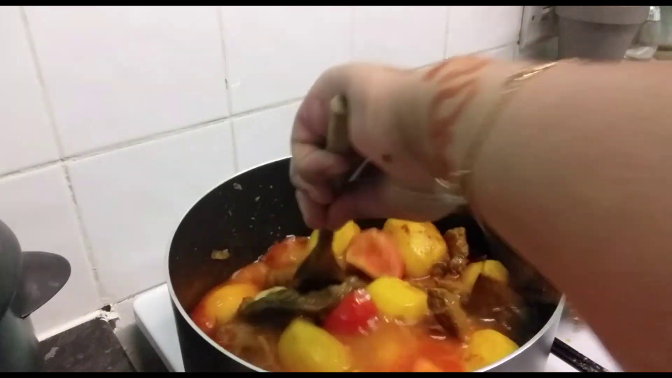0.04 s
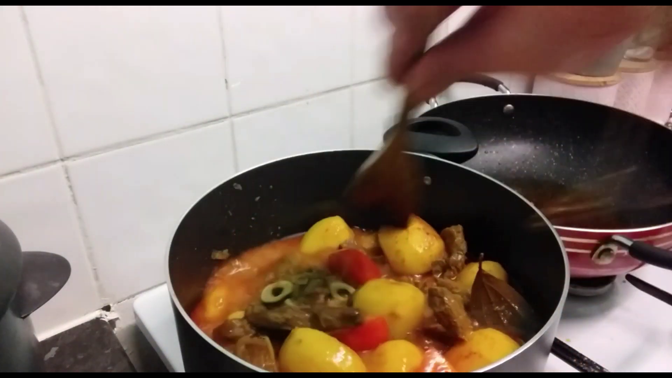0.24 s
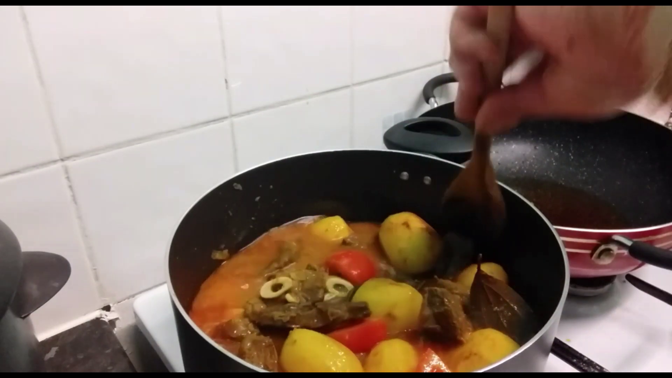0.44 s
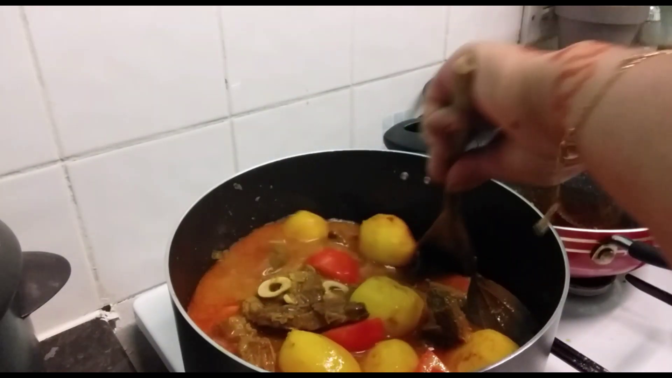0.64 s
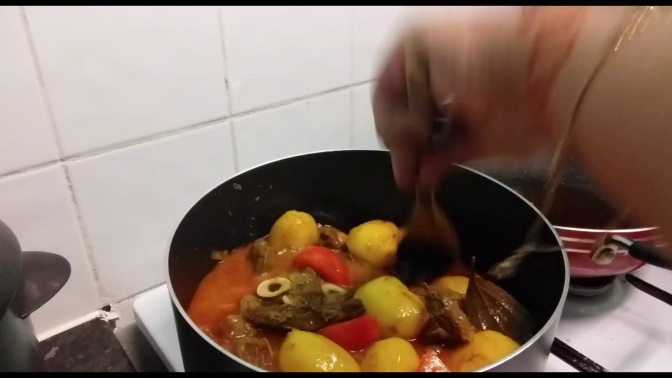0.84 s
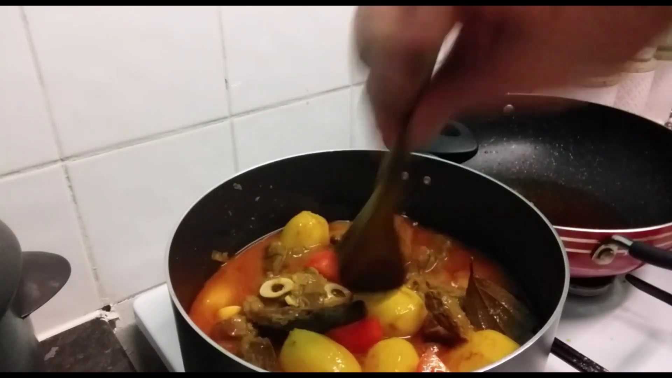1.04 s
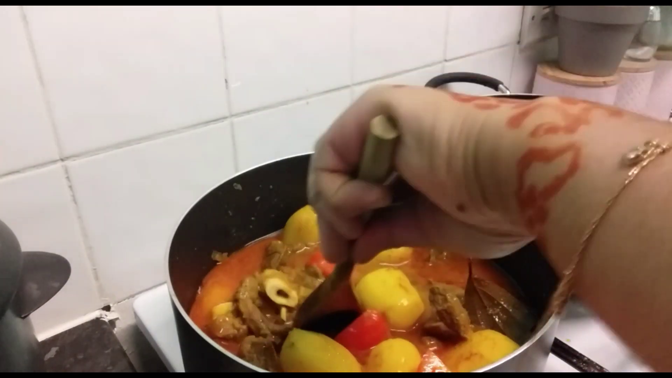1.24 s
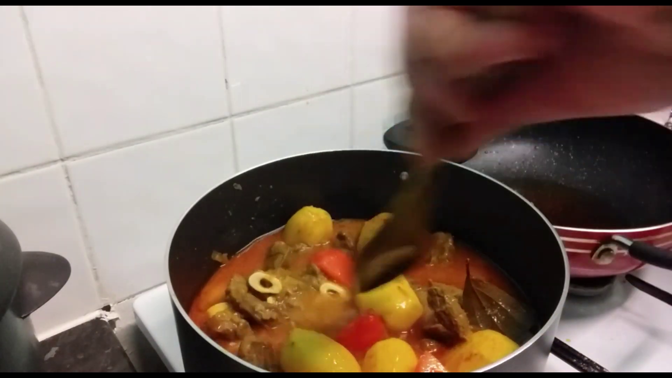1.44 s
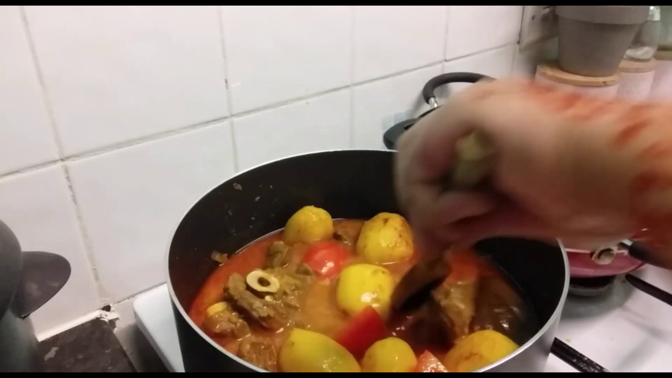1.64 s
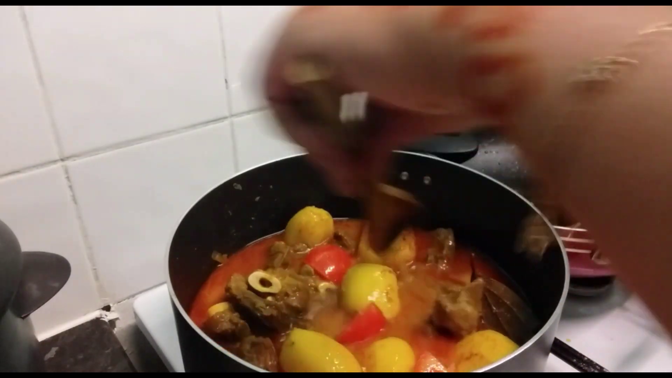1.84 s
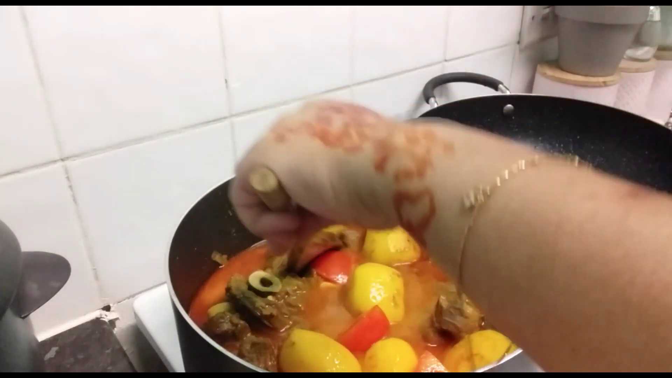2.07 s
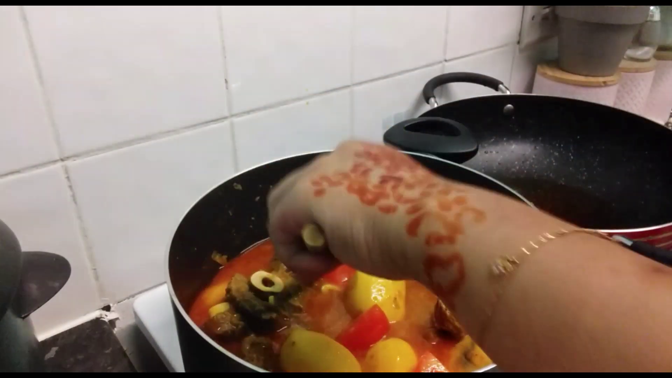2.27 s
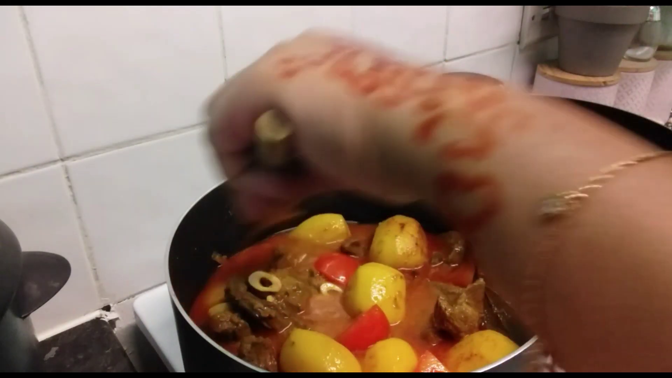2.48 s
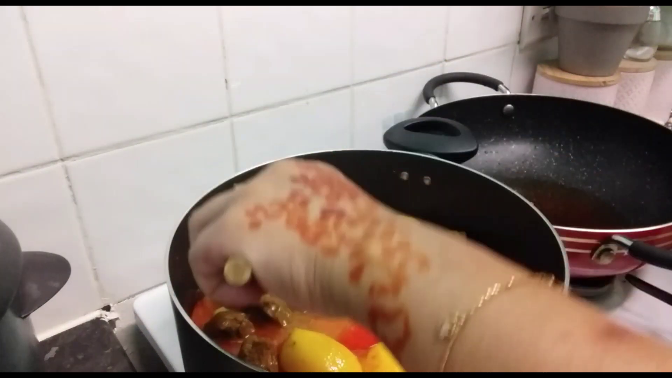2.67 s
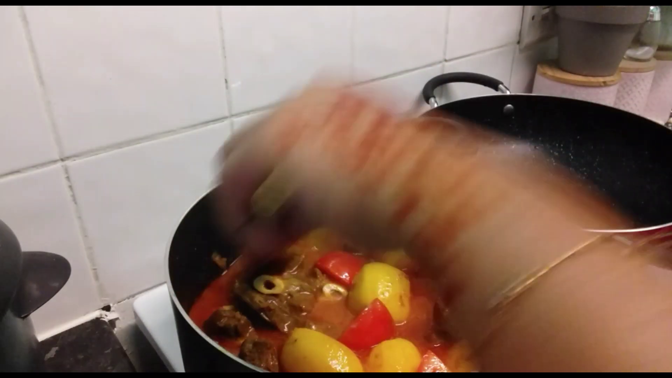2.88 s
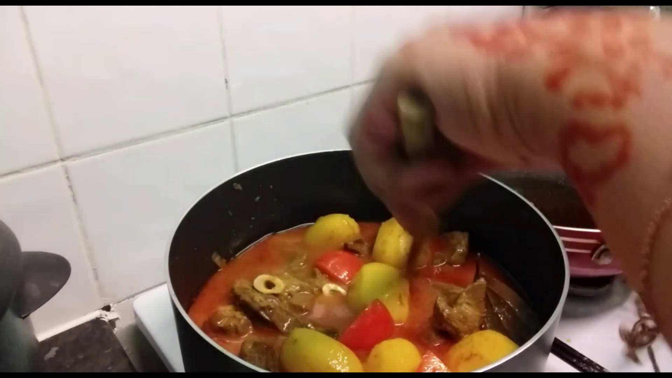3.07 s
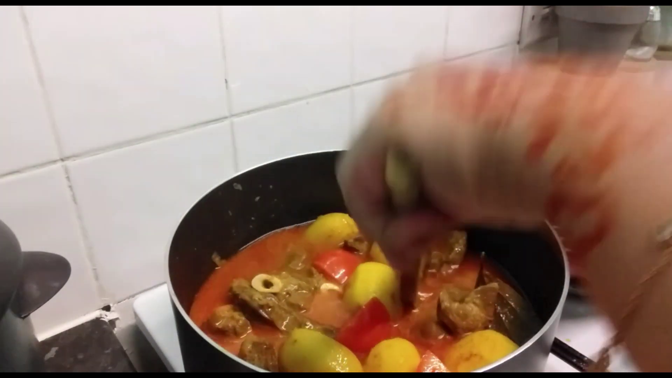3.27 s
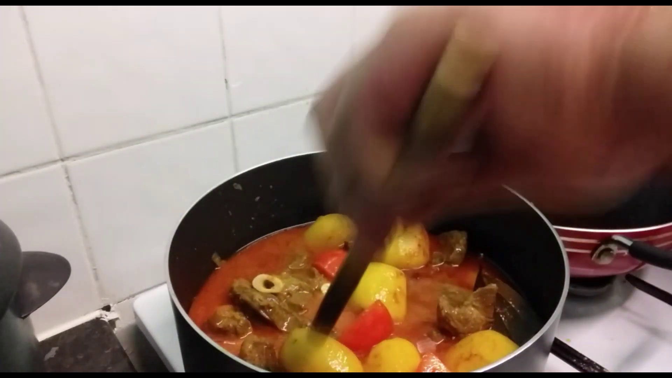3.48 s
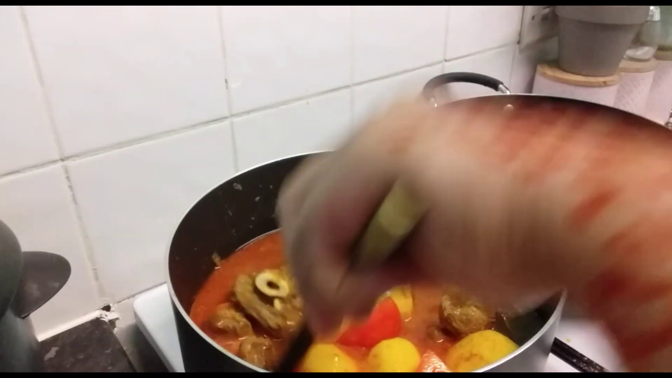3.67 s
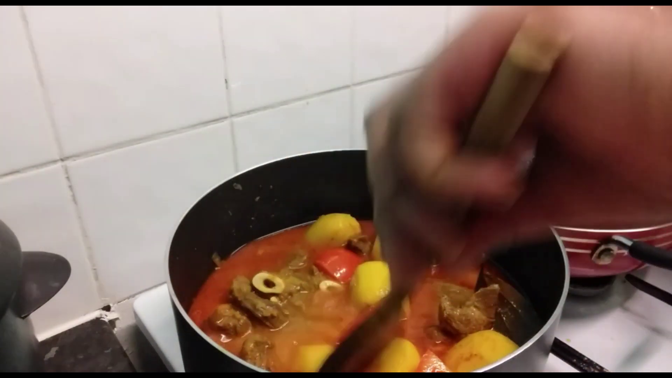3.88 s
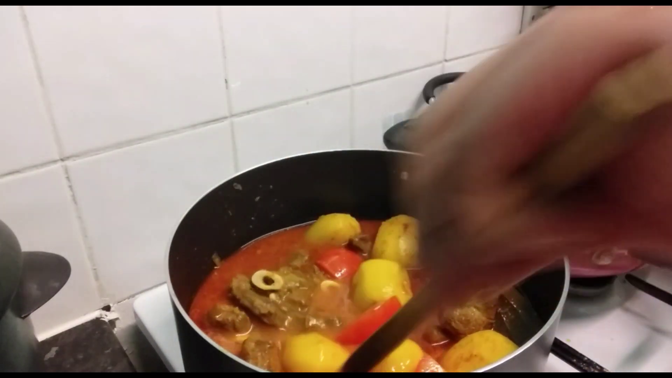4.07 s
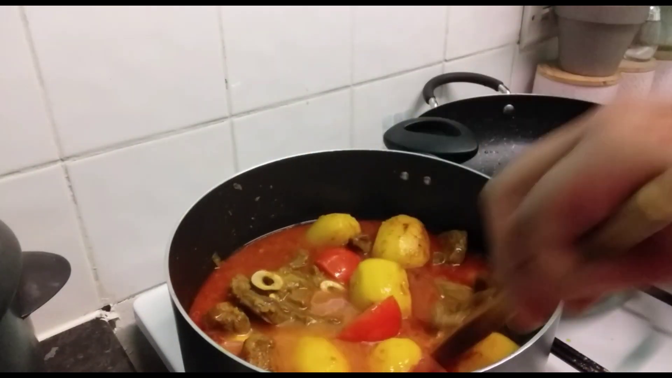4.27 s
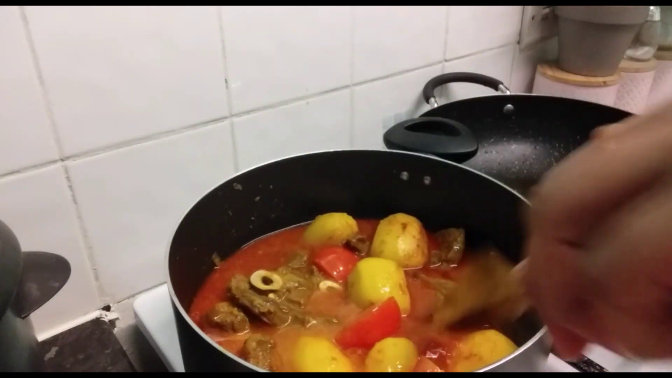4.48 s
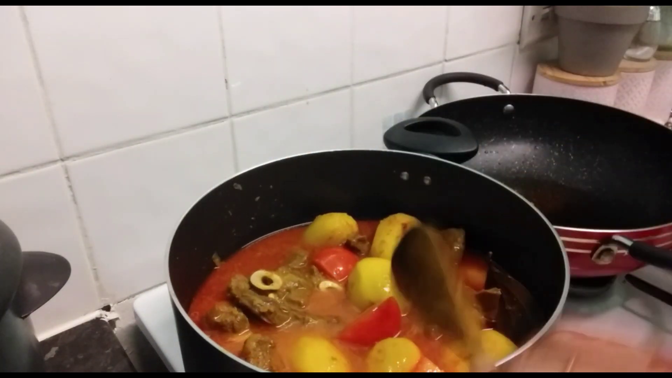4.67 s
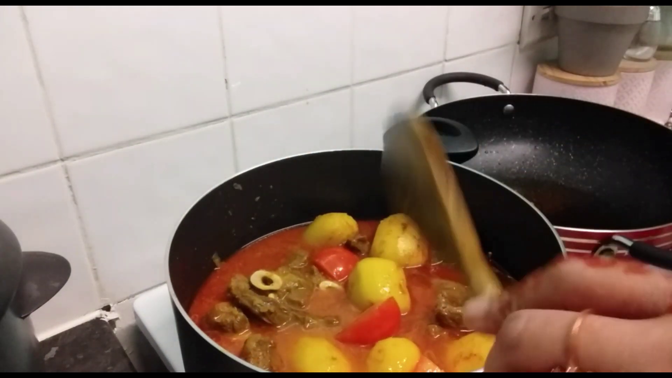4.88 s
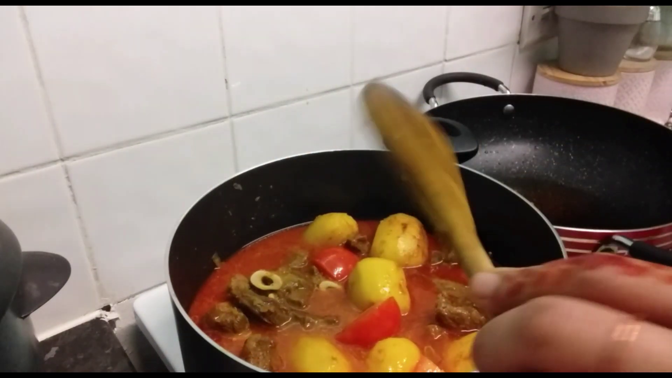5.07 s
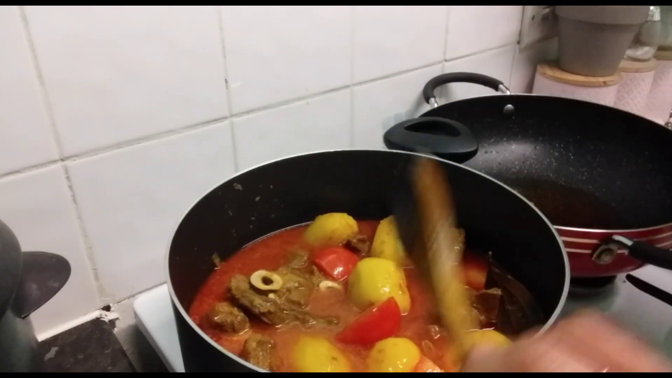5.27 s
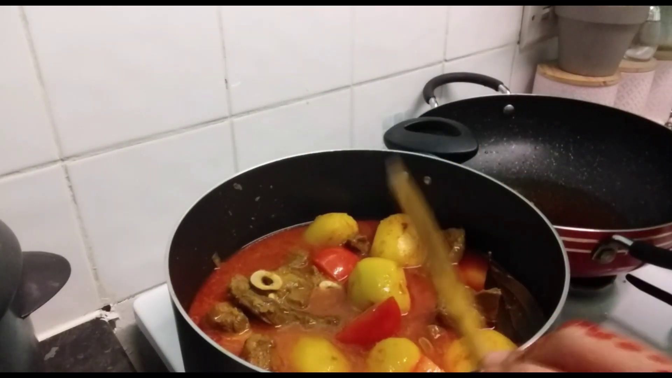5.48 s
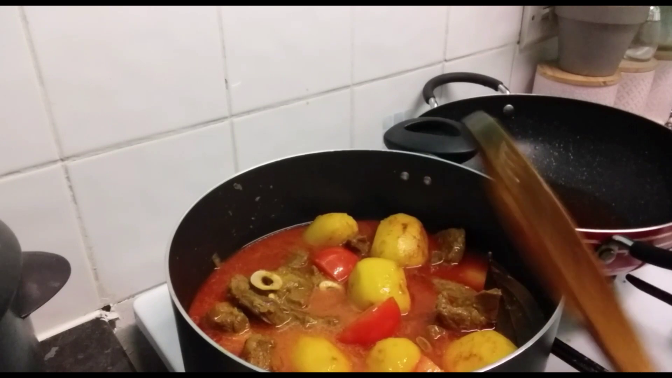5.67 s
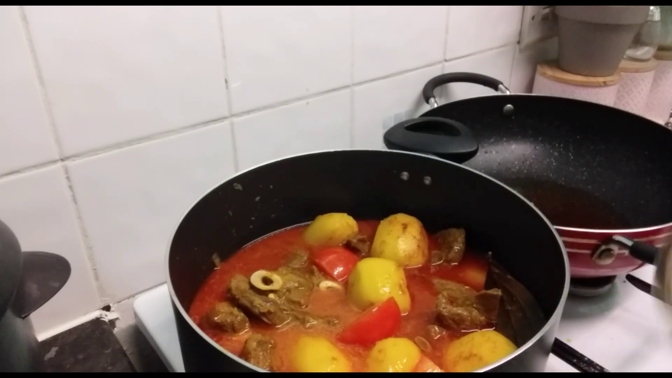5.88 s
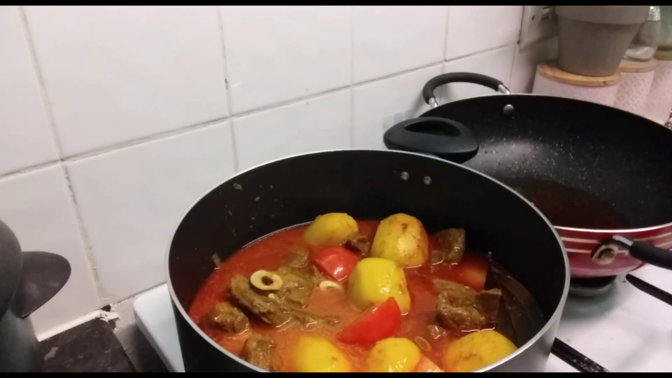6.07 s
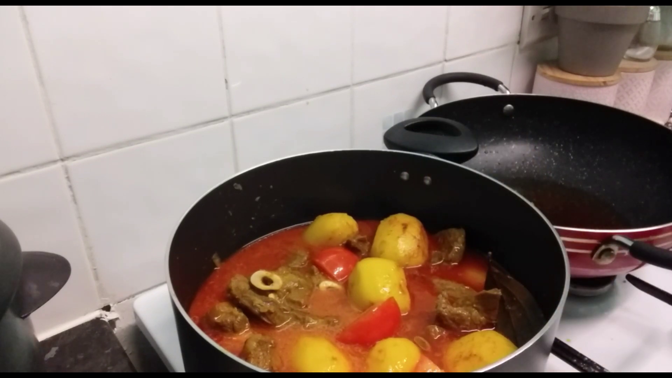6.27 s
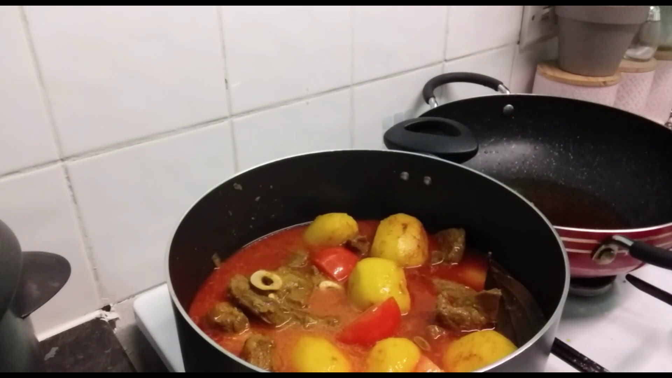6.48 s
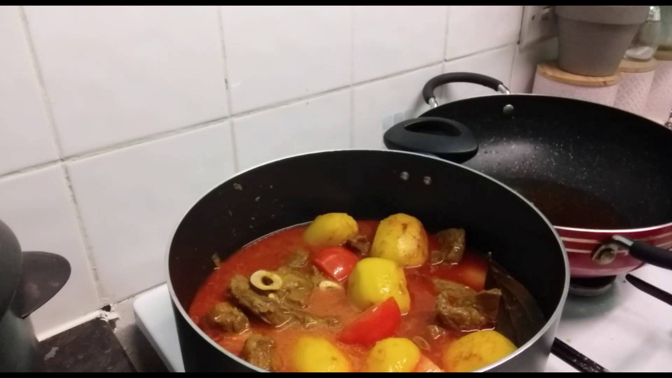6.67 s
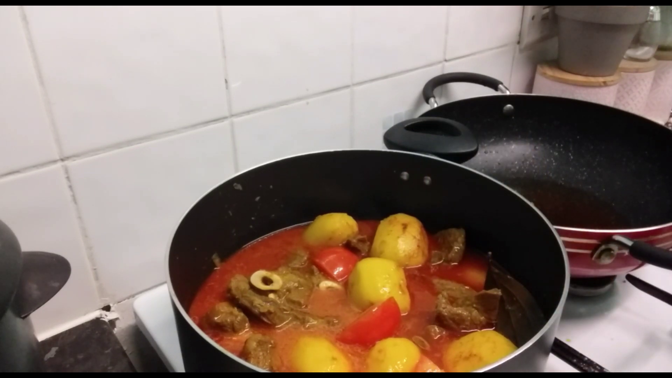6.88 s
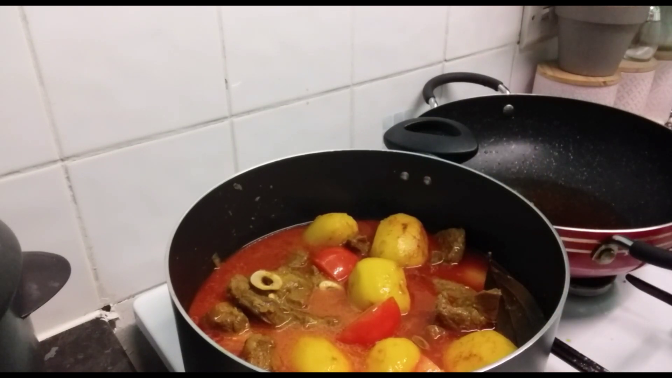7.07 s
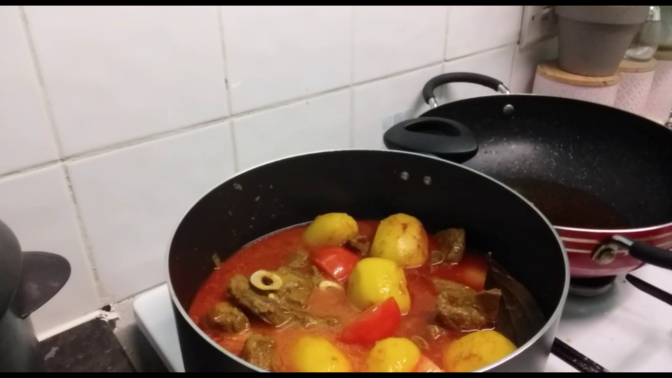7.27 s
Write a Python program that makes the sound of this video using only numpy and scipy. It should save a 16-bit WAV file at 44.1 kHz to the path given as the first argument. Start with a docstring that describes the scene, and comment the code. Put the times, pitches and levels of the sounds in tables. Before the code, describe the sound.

Stirring a pot of stew with small clicks and scrapes, then three ringing rim knocks and the clatter of a spatula set down.

```python
"""Spatula and pot in a tiled kitchen

A near-mono microphone stands back in the room, where a motor hums in close, beating tones. A spatula
ticks, rustles and scrapes in a pot, and soft bumps come through the stove. The spatula is knocked
on the ringing rim, then laid down with a clatter. The hard walls answer the clicks, scrapes and blows."""
import sys
import numpy as np
from scipy import signal
from scipy.fft import rfft, irfft, next_fast_len
from scipy.io import wavfile
from scipy.ndimage import uniform_filter1d, map_coordinates

SR = 44100
rng = np.random.default_rng(int(sys.argv[2]) if len(sys.argv) > 2 else 0)


def int16_out(signal):
    """Quantize to a 16-bit WAV file."""
    q = np.round(np.clip(np.atleast_2d(signal).T, -1, 1) * 32767)
    wavfile.write(sys.argv[1], SR, q.astype(np.int16))


N = 323233

# Reverberation of the tiled room: f/Hz, t60/s
WALL_DECAY = [(100, 0.71), (400, 0.36), (1500, 0.39), (5000, 0.35), (10000, 0.35), (16000, 0.82)]
# Early reflections off pot wall, stove top and tiles: nominal delay/s, level/dB
NEAR_ECHOES = [(.0021, -2), (.0043, -12.5), (.0068, 1), (0.0126, -17)]
# Spectrum of the room tone: f/Hz, level/dB
ROOM_SPECTRUM = [(25, -38), (60, -5.5), (99, -3), (135, -10), (204, -22), (260, -19), (350, -14),
                 (430, -2.5), (553, -18), (744, -14.5), (1000, -22), (1210, -18.5), (1500, -30),
                 (7540, -31), (9100, -40), (15600, -31)]
# Spectrum of a faint steady treble hiss, opposite in left and right: f/Hz, level/dB
SIDE_SPECTRUM = [(500, -39.5), (2000, -7), (6000, 3), (8500, 5), (16000, -4)]
# Motor tones: shaft order, rms level/dB
MOTOR_ORDERS = [(8, -76), (12, -82), (14, -72), (16, -63), (17, -60.5), (18, -72), (29, -80)]
# Drift of the strongest motor tone, order 17: t/s, f/Hz
MOTOR_PITCH = [(0, 430), (2.0, 430), (4.5, 428.5), (7.33, 427)]
# Soft bumps through the stove: t/s, level/dB, f/Hz
BUMPS = [(0.479, -44.5, 104.7), (0.618, -47, 114), (1.099, -49, 153), (1.547, -45.5, 105),
         (1.92, -40.5, 103.4), (2.532, -36, 160.6), (2.697, -53, 114), (3.123, -50, 112), (3.429, -45, 106),
         (3.484, -40, 97.6), (3.828, -42, 93), (4.207, -43, 213), (5.657, -44, 93.3), (6.801, -36, 269),
         (6.919, -39.5, 77)]
# Levels of rustle and of low rumble, which swells after the knocks: t/s, rustle/dB, rumble/dB
RUSTLE_RUMBLE_LEVELS = [(0.0, -61.5, -64), (0.2, -68, -64), (0.4, -98, -67), (0.57, -65.5, -53.5),
                        (0.68, -75, -63.5), (1.6, -67, -64.5), (1.95, -83, -59), (2.1, -64.5, -58.5),
                        (2.65, -71, -57.5), (3.2, -85, -69), (4.1, -79, -65), (4.27, -65, -56),
                        (4.319, -60.5, -40), (4.6, -86, -112), (4.8, -72, -44), (5.2, -83, -67),
                        (5.45, -64.5, -33), (5.72, -64, -57.5), (6.2, -90, -67.5), (6.53, -54.5, -49.5),
                        (6.88, -59.5, -53), (7.03, -71, -72), (7.33, -56.5, -48)]
# Spectra of the treble rustle, midrange rasp and low rumble: f/Hz, level/dB
RUSTLE_SPECTRUM = [(600, -42), (1500, 0), (2500, -24.5), (3500, 3), (5500, 1), (7500, 2), (9000, -18.5),
                   (12000, -12.5), (16000, -15.5)]
RASP_SPECTRUM = [(400, -24.0), (800, 3.0), (1600, -16.5), (2600, -12), (5000, -38.5)]
RUMBLE_SPECTRUM = [(30, -20.5), (60, -10), (105, 11.5), (135, -17), (180, -8), (260, -12.5), (450, -4),
                   (900, -18.5), (1600, -61.5)]
# Short strokes of a rubbed edge: t/s, length/s, f/Hz, sharpness Q, level/dB
SCRAPES = [(0.349, 0.045, 470, 2.6, -45.5), (0.385, 0.15, 5850, 0.39, -49), (0.431, .05, 5500, 0.45, -46),
           (0.578, 0.074, 1270, 0.52, -50.5), (0.992, 0.34, 2000, 5.6, -73.5),
           (1.955, 0.054, 870, 0.66, -59), (2.136, 0.062, 7300, 2.5, -54.5),
           (2.567, 0.06, 1580, 0.21, -47.5), (3.533, 0.075, 4700, 0.27, -54), (3.887, 0.064, 5540, .8, -67),
           (4.074, 0.25, 4440, 2.7, -70.5), (4.932, .13, 5840, 6.7, -70), (5.03, 0.13, 1134, 12, -65),
           (5.615, 0.19, 4570, 2.4, -62), (5.881, 0.11, 5040, 2.5, -66.5), (6.08, 0.18, 2520, 7.2, -78.5),
           (6.702, 0.046, 3260, 14, -60), (6.816, 0.097, 3270, 9.8, -57), (6.826, 0.1, 2350, 23, -63),
           (6.819, 0.067, 5300, 1.9, -49.5), (6.902, 0.26, 5640, 14, -63.5), (7.091, 0.13, 2356, 18, -74.5)]
# Small contacts in the pot: t/s, level/dB, click f/Hz, sharpness Q, weight/dB, thin top/dB
CONTACTS = [(0.005, -33.5, 2896, 29, -12, -22), (0.045, -40.5, 3130, 3.3, -5, 0.5),
            (0.128, -40, 4160, 8.7, -3, -15), (0.152, -30.5, 8000, 6.9, -19, -17),
            (0.167, -67, 7400, 4.5, -8, 18), (0.361, -46.5, 750, 8.8, 5, -23),
            (0.418, -37.5, 760, 0.75, -16, -37), (0.452, -22.5, 3540, 2.7, -5, -8),
            (0.459, -28.5, 4960, 9.8, 4.5, -11.5), (0.546, -27.5, 5340, 2.1, -32, -4.5),
            (0.6, -44, 1150, 2.9, -9, -22), (0.725, -41.5, 3750, 2.5, -1, -19),
            (0.857, -40.5, 7700, 8.9, -14, -7.5), (1.023, -41.5, 7150, 3, -4, -24.5),
            (1.054, -45.5, 6960, 2.2, -13, 1), (1.118, -38.5, 7700, 5.7, -5, -0.5),
            (1.373, -49.5, 3700, 1.7, -5, -17), (1.452, -57, 6040, 17, -3, -18),
            (1.549, -40, 4540, 3.4, -1, -12), (1.59, -37, 2940, 11.6, -10, -12.5),
            (1.621, -49, 2850, 1.7, 5, 8), (1.935, -37, 6950, 2.2, -19, 1.5),
            (2.015, -43, 1100, 13, 18.5, -32), (2.144, -29, 5300, 1.1, 3, -14),
            (2.533, -46, 5510, 7.7, -9, 5.5), (2.561, -30, 2370, 6.7, 4.5, -16),
            (2.635, -36, 3800, 2.6, 6, -5.5), (3.059, -64.5, 7000, 5, 0, 4.5),
            (3.527, -43.5, 7150, 6.6, 13.5, -0.5), (3.855, -59, 5600, 2.8, 4, 9),
            (4.269, -46, 4230, 7.3, -5, -25), (4.294, -36.5, 5060, 0.65, 7.5, -7),
            (4.9, -56.5, 6000, 3.6, -5, -15), (5.879, -52, 4990, 3.1, -15, -26.5),
            (6.714, -49, 3270, 15, 2, 3), (6.811, -51.5, 565, 16, 1, -20),
            (6.83, -41.5, 5550, 7.3, 11, -0.5), (7.1, -47, 3440, 6, -1.5, -12),
            (7.287, -45.5, 690, 5.6, -2, -30), (7.312, -42, 630, 5.2, -6, -7)]
# The spatula landing and settling: t/s, level/dB, brightness/dB, thud/dB
CLATTER_HITS = [(6.369, -9.5, 0.5, -3), (6.376, -11, 4.5, -7.5), (6.387, -21, 3.5, -24),
                (6.398, -15, 5.5, -19)]
# Modes rung as it lands: f/Hz, level/dB, t60/s
CLATTER_MODES = [(446, 1.5, 0.27), (566, 12, 0.044), (742, 0.5, 0.36), (788, 3, 0.41), (875, -6, 0.4),
                 (931, 1.5, 0.42), (990, -10.5, 0.22), (1162, -5, 0.45), (1405, 2.5, 0.39),
                 (1568, -9.5, 0.29), (3290, -16, 0.6), (3570, -8.5, 0.34), (3830, -13, 0.3),
                 (5120, -9, 0.4)]
# Spectrum of the landing's impact: f/Hz, level/dB
CLATTER_SPECTRUM = [(29, -67), (50, -17.5), (113, -11.5), (404, -7), (434, -5), (489, -10), (668, -8.5),
                    (718, -11.5), (1050, -7.5), (1440, -14), (2900, -20.5), (3500, -23), (5140, -18),
                    (15500, -46.5)]
# Knocks on the rim, the last with a bounce: t/s, level/dB, brightness/dB, thud/dB
RIM_HITS = [(4.647, -16.5, -6, -3.5), (5.195, -18.5, -2.5, -5), (5.391, -10, -3.5, -8.5),
            (5.424, -19.5, 0, -12)]
# Modes of the pot struck on its rim: f/Hz, level/dB, t60/s
RIM_MODES = [(110.7, 7, 0.65), (166, 2.5, 0.68), (296, -2.5, 0.55), (620, -11, 0.28), (737, -1, 0.37),
             (780, -0.5, 0.33), (1189, -3.5, 0.34), (1056, -8, 0.44), (1650, 7, 0.16), (1745, -0.5, 0.31),
             (2910, -9.5, 0.24), (3350, -18, 0.19), (4107, -2.5, .25)]
# Spectrum of the impact on the rim: f/Hz, level/dB
RIM_SPECTRUM = [(29, -74), (50, -8.5), (103, -1.5), (250, -8.5), (771, -8), (1400, -10), (1700, -5.5),
                (2000, -13.5), (3200, -12), (3750, -16), (4150, -10.5), (7730, -14.5), (8920, -27.5),
                (15500, -32)]


def amp(db):
    """Decibels to amplitude."""
    return 10 ** (np.asarray(db) / 20)


def unit_rms(x):
    """x scaled to rms 1."""
    return x / np.sqrt(np.mean(x ** 2) + 1e-20)


def along(points, hz):
    """Interpolate (f/Hz, value) points on a log frequency axis."""
    f, v = np.transpose(points)
    return np.interp(np.log(hz + 1), np.log(f + 1), v)


def wobble(rate):
    """A smooth random curve, rate knots a second."""
    return map_coordinates(rng.standard_normal(int(N * rate / SR) + 4), [np.arange(N) * rate / SR])


def pulse(t, rise_s=0.00002):
    """One smooth push, reaching 1 after rise_s."""
    u = t / rise_s
    return u * np.exp(1 - u)


def filtered(x, response):
    """x through a complex frequency response."""
    n = x.shape[-1]
    padded = next_fast_len(n + 8192)
    return irfft(rfft(x, padded) * response(np.fft.rfftfreq(padded, 1 / SR)), padded)[..., :n]


def minimum_phase(points):
    """The causal response with the gain of (f/Hz, level/dB) points."""
    def response(hz):
        cepstrum = irfft(np.log(amp(np.maximum(along(points, hz), -70))))
        half = len(cepstrum) // 2
        cepstrum[1:half] *= 2
        cepstrum[half + 1:] = 0
        return np.exp(rfft(cepstrum))
    return response


def band(f, hz, q):
    """Response of one resonance at hz."""
    return 1j * f * hz / q / (hz * hz - f * f + 1j * f * hz / q)


def lowpass(f, hz, slope):
    """Gain that falls away above hz."""
    return 1 / (1 + (f / hz) ** slope)


def noise(spectrum, patchy_db):
    """Coloured noise of rms 1, spread unevenly over time and pitch."""
    cells = signal.stft(rng.standard_normal(N + SR), nperseg=512)[2]
    patches = uniform_filter1d(rng.standard_normal(cells.shape), size=6, axis=0)
    patches = uniform_filter1d(patches, size=10, axis=1)
    patchy = signal.istft(cells * amp(patchy_db * unit_rms(patches)), nperseg=512)[1][:N]
    return unit_rms(filtered(patchy, lambda hz: amp(along(spectrum, hz))))


def walls(source, room_db, build_s):
    """The tiles' answer alone: echoes thicken over build_s, and each frequency dies at its own speed."""
    n = len(source)
    hz, t, cells = signal.stft(rng.standard_normal(n), SR, nperseg=256)
    decay = amp(-60 * t / along(WALL_DECAY, hz)[:, None])
    tail = signal.istft(cells * decay, SR, nperseg=256)[1][:n]
    tail *= 1 - np.exp(-np.arange(n) / SR / build_s)
    return amp(room_db) * signal.fftconvolve(source, tail / np.linalg.norm(tail))[:n]


def room_tone():
    """The kitchen's low hush, behind everything."""
    return amp(-63) * noise(ROOM_SPECTRUM, patchy_db=1.5)


def motor():
    """In the background, orders of one slowly drifting shaft beat against each other."""
    times, hz = np.transpose(MOTOR_PITCH)
    shaft_hz = np.interp(np.arange(N) / SR, times, hz) / 17
    angle = 2 * np.pi * np.cumsum(shaft_hz) / SR
    hum = np.zeros(N)
    for order, db in MOTOR_ORDERS:
        level = np.sqrt(2) * amp(db + 1.3 * wobble(4))
        hum += level * np.sin(order * angle + 0.2 * wobble(4) + rng.uniform(0, 2 * np.pi))
    return hum


def stove_bumps(t60_cycles=38):
    """Each bump through the stove swells for a moment and rings low, with a rough overtone."""
    out, t = np.zeros(N + SR), np.arange(SR // 2) / SR
    for start, db, hz in BUMPS:
        grit = unit_rms(filtered(rng.standard_normal(len(t)), lambda f: band(f, 1.53 * hz, q=1.5)))
        ring = np.sin(2 * np.pi * hz * t) + 0.43 * grit
        envelope = amp(db - 60 * t * hz / t60_cycles) * (1 - np.exp(-t / 0.035))
        out[round(start * SR):][:len(t)] += envelope * ring
    return out[:N]


def rustle_and_rumble():
    """A grainy treble rustle over a midrange rasp, and a low rumble that swells after the knocks."""
    times, *levels = np.transpose(RUSTLE_RUMBLE_LEVELS)
    rustle_db, rumble_db = (np.interp(np.arange(N) / SR, times, db) for db in levels)
    grain_db, lumps_db = 1.5 * wobble(70), 2.5 * wobble(18)
    rustle = amp(rustle_db + grain_db) * noise(RUSTLE_SPECTRUM, patchy_db=2)
    rasp = amp(rustle_db - 7) * noise(RASP_SPECTRUM, patchy_db=4)
    rumble = amp(rumble_db + lumps_db) * noise(RUMBLE_SPECTRUM, patchy_db=4)
    return rustle + rasp + rumble


def edge_scrapes(rise_share=0.19):
    """A rubbed edge hisses around one mode, swells and fades along the stroke, then hangs in the room."""
    out = np.zeros(N + SR)
    for start, length, hz, q, db in SCRAPES:
        progress = np.arange(SR) / SR / length
        top_hz = max(8200, 1.44 * hz)
        mode = lambda f: band(f, hz, max(q, 0.5)) ** 2 * lowpass(f, top_hz, slope=16)
        hiss = unit_rms(filtered(rng.standard_normal(SR), mode))
        stroke = hiss * (1 - np.exp(-progress / rise_share)) * np.exp(-progress ** 3)
        out[round(start * SR):][:SR] += amp(db) * (stroke + walls(stroke, room_db=-5, build_s=0.0019))
    return out[:N]


def contact_body(f, q, weight_db, top_db):
    """Response around a click: a snap, a knock and a thud that grow with weight, and a thin top."""
    snap_db = 5 - 2 * q  # ringing clicks snap less
    snap = 1.9 * amp(snap_db) * band(f, 3130, q=1) * band(f, 7240, q=5.6) * lowpass(f, 8200, slope=24)
    knock = amp(weight_db - 1.5) * band(f, 900, q=1.9) ** 2
    thud = amp(weight_db + 2.5) * band(f, 183, q=1.68) ** 2
    top = amp(top_db) * band(f, 8500, q=0.35) / (1 + (9500 / (f + 1)) ** 12)
    return snap + knock + thud + top


def spatula_ticks():
    """Each touch on the pot pushes a pitched click and its body; surfaces around it repeat it."""
    out, t = np.zeros(N + SR), np.arange(SR * 3 // 4) / SR
    for start, db, hz, q, weight_db, top_db in CONTACTS:
        push = pulse(t) + 0.15 * amp(-60 * t / 0.002) * rng.standard_normal(len(t))
        mode = lambda f: band(f, hz, max(q, 1)) * band(f, hz, q=0.067) * lowpass(f, 8300, slope=16)
        click = filtered(push, mode)
        body = filtered(push, lambda f: contact_body(f, q, weight_db, top_db))
        contact = click / np.abs(click).max() + 3.93 * body
        echoes = np.zeros(len(t))
        for delay, echo_db in NEAR_ECHOES:
            gain = amp(echo_db + rng.normal(0, 1.1))
            echoes += gain * np.roll(contact, round(delay * rng.uniform(0.44, 1.1) * SR))
        room_db = 5.5 - 0.28 * (db + 34.5)  # louder ticks are drier
        room = walls(contact, room_db, build_s=0.0063)
        out[round(start * SR):][:len(t)] += amp(db) * (contact + echoes + room)
    return out[:N]


def ringing(modes, t):
    """Decaying modes of a struck object; reflections make them waver, the high ones faster."""
    ring = np.zeros(len(t))
    for hz, db, t60 in modes:
        knot_rate, depth = 40 + hz / 25, 0.68 * min(hz / 700, 1)
        real, imag = (map_coordinates(k, [t * knot_rate], order=1) for k in rng.standard_normal((2, 200)))
        waver = 1 + depth * (real + 1j * imag)
        ring += amp(db - 60 * t / t60) * np.imag(np.exp(2j * np.pi * hz * t) * waver)
    return ring


def blows(hits, modes, spectrum, crack_db, ring_db, room_db, build_s, crack_t60_s=0.014):
    """Each blow cracks in the object's colour, rings its modes and sets off the walls."""
    out, t = np.zeros(N + SR), np.arange(SR * 3 // 4) / SR
    colour = minimum_phase(spectrum)
    for start, db, bright_db, thud_db in hits:
        ring = amp(ring_db) * ringing(modes, t) * (1 - np.exp(-t / build_s))
        crack = filtered(amp(-60 * t / crack_t60_s) * rng.standard_normal(len(t)), colour)
        crack *= amp(crack_db) / np.abs(crack).max()
        push = filtered(pulse(t), colour)
        room = walls(push / np.linalg.norm(push), room_db, build_s)
        tilt = minimum_phase([(150, thud_db), (400, 0.0073), (1800, 0.0033), (4000, bright_db)])
        out[round(start * SR):][:len(t)] += amp(db) * filtered(crack + ring + room, tilt)
    return out[:N]


def spatula_clatter():
    """The spatula is laid down and settles in a quick run of hits."""
    return blows(CLATTER_HITS, CLATTER_MODES, CLATTER_SPECTRUM,
                 crack_db=-5, ring_db=-15, room_db=22.5, build_s=0.0044)


def rim_knocks():
    """The spatula strikes the rim and the pot rings, echoing in the room."""
    return blows(RIM_HITS, RIM_MODES, RIM_SPECTRUM,
                 crack_db=3.5, ring_db=-17, room_db=24.5, build_s=0.0052)


def scene():
    """The kitchen sits dead centre, with a faint steady treble hiss, opposite in left and right."""
    mid = spatula_ticks() + stove_bumps() + edge_scrapes() + rustle_and_rumble() + motor() + room_tone()
    mid += rim_knocks() + spatula_clatter()
    side = amp(-86.5) * noise(SIDE_SPECTRUM, patchy_db=-2)
    return np.array([mid + side, mid - side])


def record(dry):
    """Deep bass is cut; the treble drops above 15.8 kHz and ends near 17 kHz."""
    low_cut_hz, shelf_hz, limit_hz = 45, 15800, 16963
    bass = lambda hz: (1j * hz / (low_cut_hz + 1j * hz)) ** 2
    treble = lambda hz: np.where(hz < shelf_hz, 1, amp(-20.5)) * (hz < limit_hz)
    return filtered(dry, lambda hz: bass(hz) * treble(hz))


dry = scene()
out = record(dry)
int16_out(out)
```